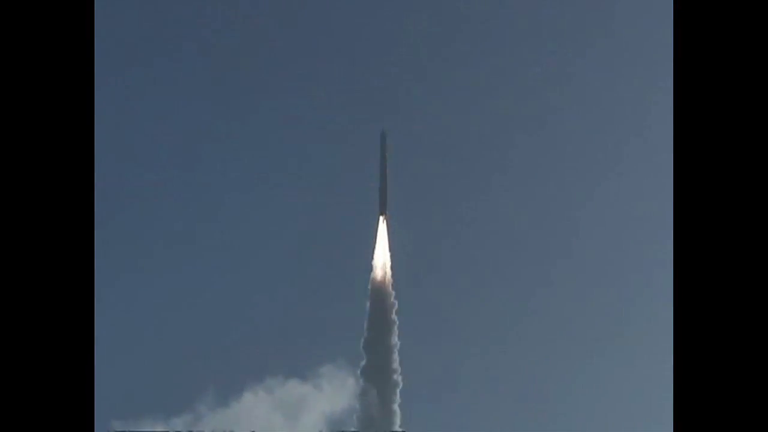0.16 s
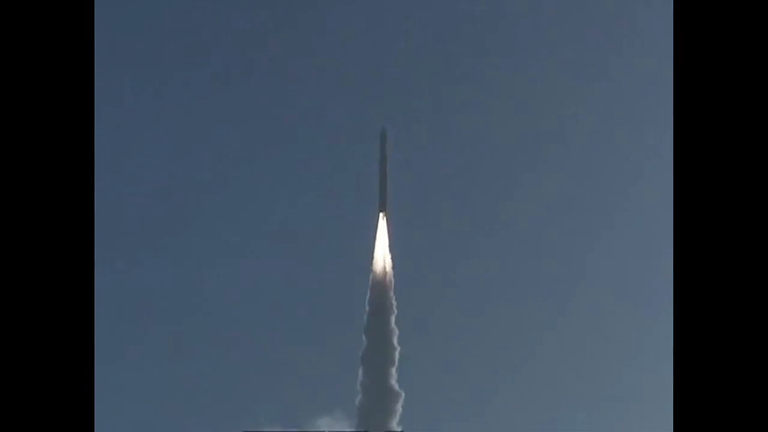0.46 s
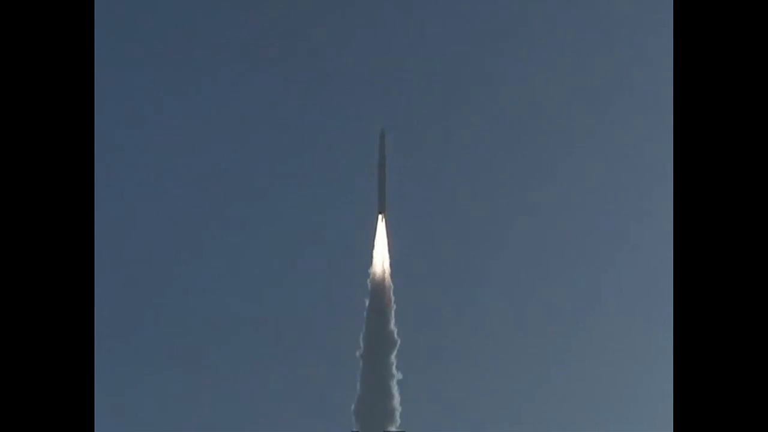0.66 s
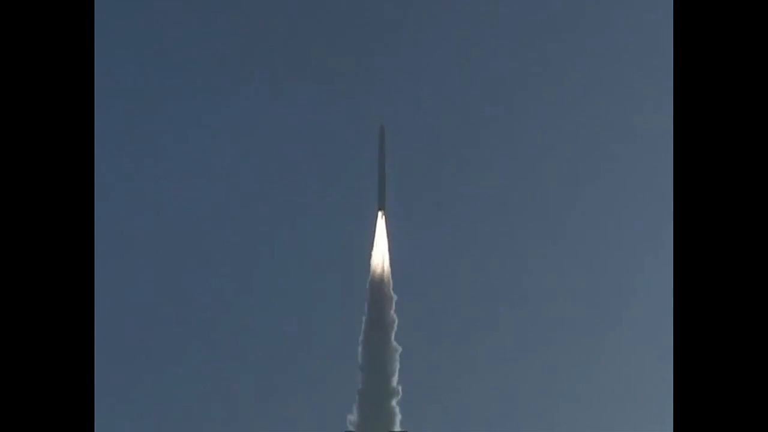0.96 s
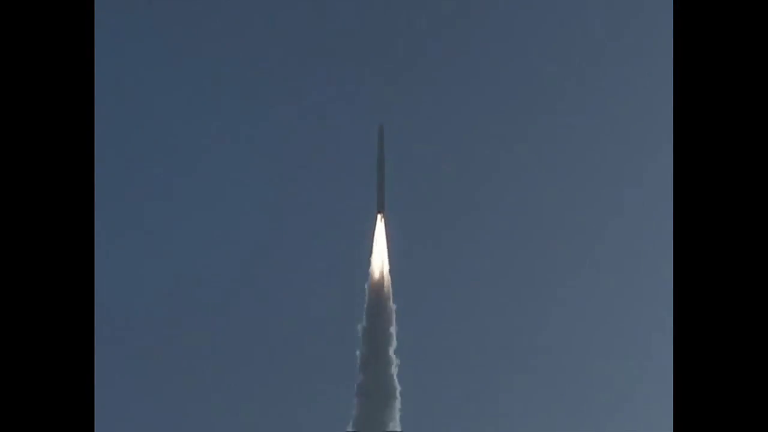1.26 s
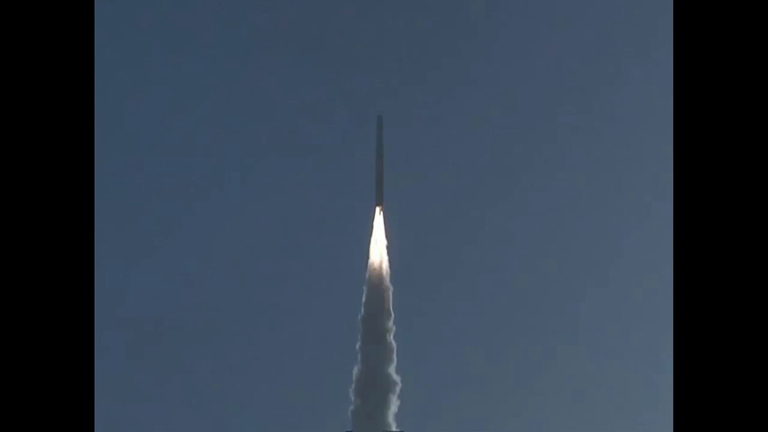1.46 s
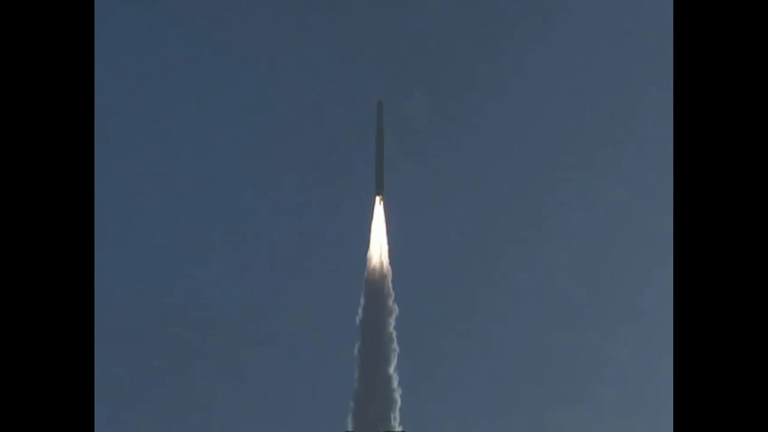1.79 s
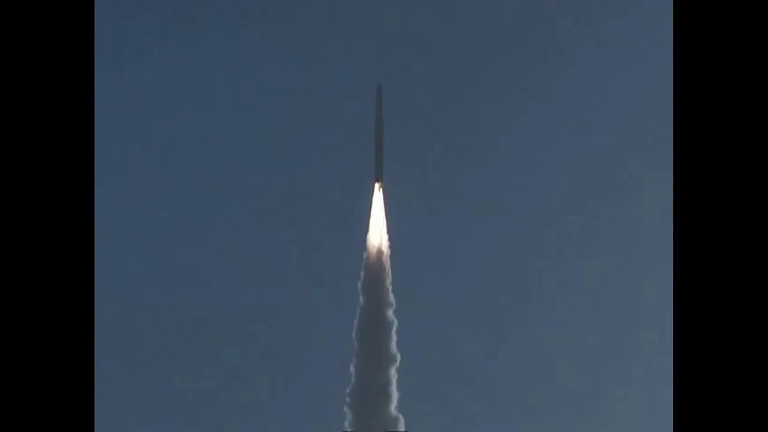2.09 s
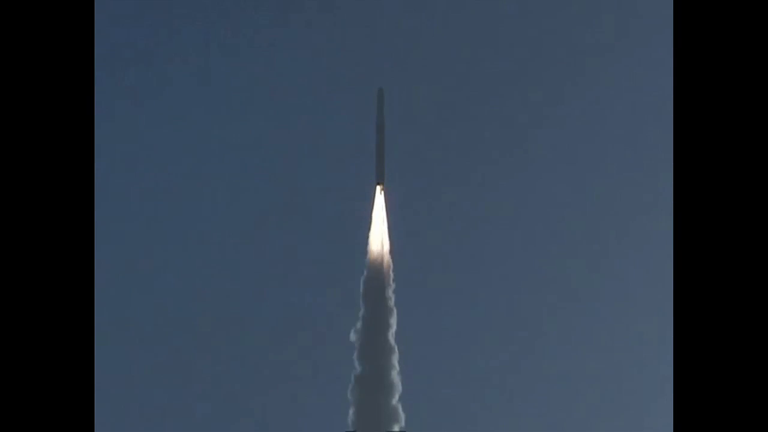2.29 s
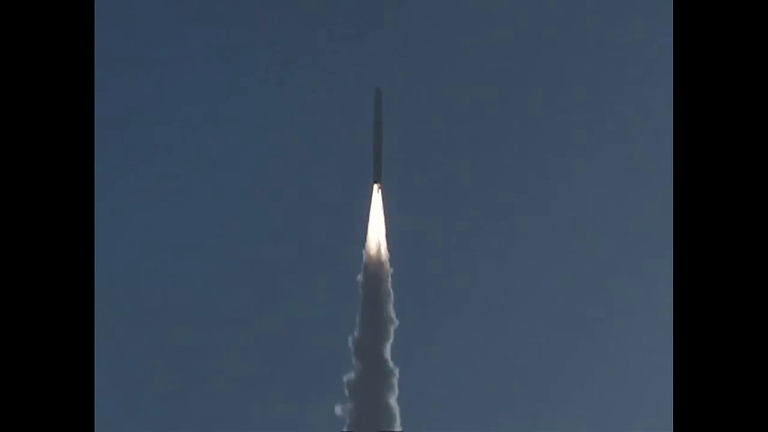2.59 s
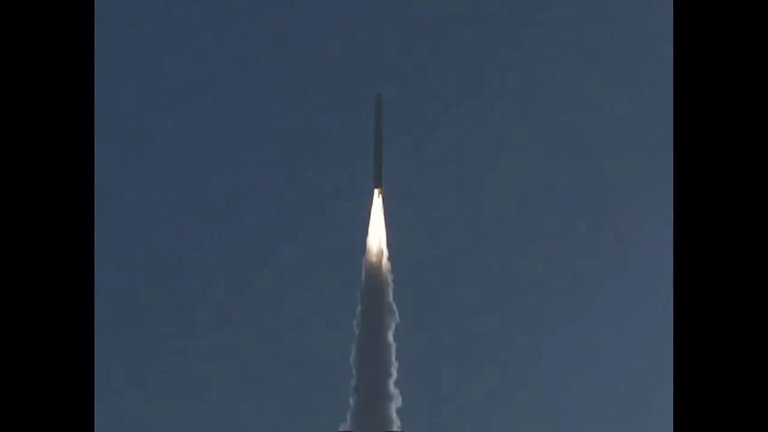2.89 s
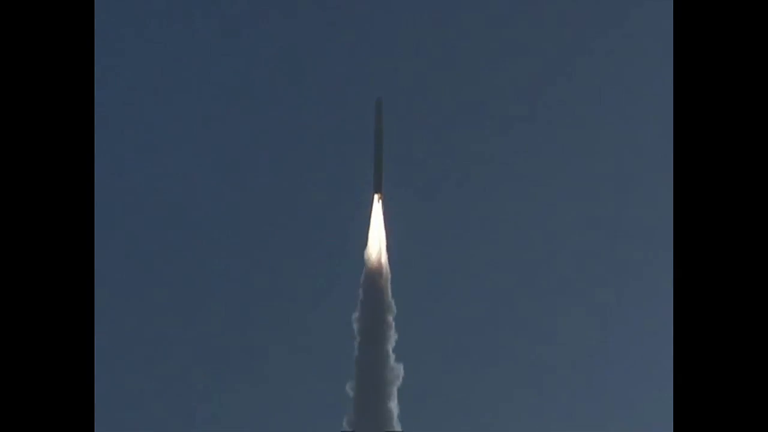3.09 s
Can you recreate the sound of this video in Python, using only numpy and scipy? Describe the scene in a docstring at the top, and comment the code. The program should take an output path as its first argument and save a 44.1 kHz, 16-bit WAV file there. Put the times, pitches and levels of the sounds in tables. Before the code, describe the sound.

Far-off rocket engines suddenly roar over a quiet windy field, peak, and settle into low rumble

```python
"""Light wind on the microphone with rustles and ticks nearby; then a far-off rocket's roar reaches the field,
swells fast and settles to a rumble with soft crackle; near the end, more ticks, a whirr and a squeak.
The roar is filtered noise plus random shocks, notched by a delayed ground echo. Wind, rustles, brushes
and hiss are shaped noise, ticks are fuzzy decaying sines, the whirr is banded noise, the squeak a gliding sine."""
import sys
import numpy as np
from scipy import signal
from scipy.fft import rfft, irfft
from scipy.io import wavfile
from scipy.ndimage import uniform_filter1d

SR = 44100
rng = np.random.default_rng(int(sys.argv[2]) if len(sys.argv) > 2 else 0)


def nominal_scale(level):
    """Amplitude ratio for a level in decibels (scalar or array-like)."""
    x = np.asarray(level, float) / 20
    return 10 ** x


def put_to_file(sound):
    """Save the sound as 16-bit audio at rate SR, in the file named by the first command-line argument."""
    columns = np.atleast_2d(sound).T  # one column per channel
    safe = np.clip(columns, -1, 1)
    whole_steps = np.round(safe * 32767)
    wavfile.write(sys.argv[1], SR, whole_steps.astype(np.int16))


N = 143325
T = np.arange(N) / SR
FRAME, HOP = 1024, 256  # short-time spectrum [samples]
PIVOT_HZ = 500  # the roar and its shocks are tilted above this


# roar at the listener: (time [s], level [dB], brightness above the pivot [dB/octave], extra bass [dB])
ROAR_PATH = [(1.12, -76, 2, -3.5), (1.2, -60.5, 4, 3), (1.27, -46, 0, -5), (1.35, -29.5, 0.4, -0.5),
             (1.44, -22.5, 0, -2), (1.54, -16.5, 0.75, -4), (1.64, -20, 1.1, 0), (1.72, -25.5, 1, 0.5),
             (1.79, -28.5, 2, -4.5), (1.9, -29, 0, 1), (2.05, -31, 1, 3), (2.25, -28.5, -1, 0.5),
             (2.5, -30.5, -2, 2.5), (2.65, -31.5, -0.75, 0), (2.8, -30, -0.2, 2.7), (3.0, -29, -1, 2),
             (3.12, -27.5, -1, -2.3), (3.25, -27, -1.2, -3.7)]
# relative spectrum of exhaust noise after the long air path: (frequency [Hz], density [dB per Hz])
EXHAUST_COLOUR = [(8, -41), (16, -11), (45, -4.5), (70, -3.5), (100, -4.5), (170, -6), (300, -9),
                  (480, -20), (620, -19.5), (900, -29), (1200, -33.5), (1500, -37), (2000, -41.5),
                  (2500, -46), (3200, -53), (4200, -60.5), (6000, -69.5), (9000, -75), (12000, -82.5),
                  (20000, -120)]


def roar():
    """Turbulent exhaust noise and shocks, patchy from drifting air, plus a soft ground echo that notches them."""
    flicker_db, patchy_db = 2.18, 0.71  # both rms
    shock_db = -1.2  # relative to the exhaust noise
    tilt_octaves, tilt_fade = 2.78, 1  # brightening peaks this far above the pivot, then fades
    bass_hz = 210  # top of the bass band
    echo_delay_s, echo_share, echo_soft_hz, echo_lag_rad = 0.002135, 0.8, 1450, 0.07

    flicker = nominal_scale(flicker_db * drift(size=300, count=N))
    exhaust = evened(coloured(rng.standard_normal(N) * flicker, EXHAUST_COLOUR))
    hz, t, z = patchy(exhaust - nominal_scale(shock_db) * shocks(), patchy_db, size=6, count=14)

    octaves = np.maximum(np.log2(hz / PIVOT_HZ + 1e-9), 0)
    tilt = octaves - (1 + tilt_fade) * np.maximum(octaves - tilt_octaves, 0)
    brightness_db = curve(ROAR_PATH, t, order=2) * tilt
    bass_db = curve(ROAR_PATH, t, order=3) / (1 + (hz / bass_hz) ** 4)
    direct = resynth(z * nominal_scale(brightness_db + bass_db))

    f = np.fft.rfftfreq(2 * N, 1 / SR)
    echo = echo_share * np.exp(-2j * np.pi * f * echo_delay_s - 1j * echo_lag_rad - f / echo_soft_hz)
    heard = irfft(rfft(direct, 2 * N) * (1 + echo))[:N]
    return evened(heard) * nominal_scale(curve(ROAR_PATH, T)) * (T > ROAR_PATH[0][0])


# loudest cracks in the roar: (time [s], size over the smallest random shock, before the spread is added [dB])
LOUD_CRACKS = [(1.453, 10), (1.479, 2), (1.536, 5.5), (1.542, 9.5), (1.566, 4), (1.598, 10), (1.629, 12.5),
               (1.638, 10), (1.686, 13.5), (1.76, 1), (1.826, -1), (2.005, 14.5), (2.028, 9), (2.071, 12),
               (2.383, 12), (2.511, 14.5), (2.958, 11.5)]


def shocks():
    """Sudden pressure fronts of uneven size, each with a short tail smeared by air turbulence."""
    per_s, spread_db = 700, 3.5
    scatter_s, scatter_db = 0.003, -3  # tail's amplitude decay time, its energy relative to the front

    size = nominal_scale(spread_db * np.minimum(rng.exponential(1, N), 4))
    fronts = size * (rng.random(N) < per_s / SR)
    fronts = fronts * np.sign(rng.random(N) - 0.3)  # seven in ten are positive
    for s, db in LOUD_CRACKS:
        fronts[round(s * SR)] += nominal_scale(db + spread_db)

    tail = np.exp(-2 * T[:1500] / scatter_s)  # decay of energy
    energy = abs(signal.oaconvolve(fronts ** 2, tail / tail.sum())[:N])
    scattered = nominal_scale(scatter_db) * rng.standard_normal(N) * np.sqrt(energy)
    return evened(coloured(fronts + scattered, EXHAUST_COLOUR, tilt_db=1.3, pivot_hz=PIVOT_HZ))


# gusts: (time [s], level [dB])
GUSTS = [(0.0, -81), (0.062, -60.5), (0.072, -97), (0.134, -54), (0.188, -67), (0.2, -49.5), (0.306, -50.5),
         (0.508, -58.5), (0.894, -51), (0.932, -67), (1.106, -71), (1.186, -72), (1.25, -72)]
# relative spectrum of the buffeting: (frequency [Hz], density [dB per Hz])
GUST_COLOUR = [(8.8, -22), (15, -7), (39, 3), (152, -10.5), (249, -19), (396, -32), (600, -44), (780, -79),
               (1320, -120)]


def wind():
    """Low noise with slow random lumps for buffeting; after the last gust it dies away at 100 dB/s."""
    lumps = nominal_scale(1 * drift(size=900, count=N))  # 1 dB rms
    gusts = evened(lumps * coloured(rng.standard_normal(N), GUST_COLOUR))
    return gusts * nominal_scale(curve(GUSTS, T) - 100 * np.maximum(T - GUSTS[-1][0], 0))


# rustles of grass or cloth: (start [s], hold [s], level [dB], fade t60 [s], brightest frequency [Hz])
RUSTLE_EVENTS = [(0.0, 0.086, -57.5, 0.013, 7000), (0.263, 0.026, -54, 0.14, 3900),
                 (0.322, 0.025, -54, 0.083, 6500), (0.346, 0.036, -58.5, 0.39, 4240),
                 (0.451, .006, -63, .02, 2500), (0.465, 0.011, -57.5, 0.071, 2500),
                 (0.487, 0.033, -69, 0.3, 4500), (0.54, 0.059, -67.5, 0.31, 2500),
                 (0.605, 0.036, -80, 0.11, 8000), (0.639, 0.018, -64, 0.29, 8000),
                 (0.676, 0.031, -73.5, 0.079, 3530), (0.731, 0.046, -66.5, 0.074, 4300),
                 (.79, 0.33, -78.5, 0.54, 4000), (0.858, 0.015, -72, 0.061, 5600),
                 (3.004, 0.19, -74.5, 0.11, 8800)]
# relative spectrum they share: (frequency [Hz], density [dB per Hz])
RUSTLE_COLOUR = [(290, -28), (500, -9.5), (984, -18), (1550, -8), (1700, -10.5), (2040, -6), (2430, -9),
                 (2810, -4.5), (3660, -4), (4130, -1), (5390, -7.5), (7030, -5.5), (8920, -7.5),
                 (10600, -8.5), (12000, -13.5), (15500, -49), (22000, -120)]


def rustles():
    """Grainy, patchy noise that starts abruptly, holds and fades; each has its own brightest region."""
    grain_db, patchy_db = 1.5, 1.5  # both rms
    hump_db, hump_octaves, attack_s = 8, 1, 0.0007

    grain = rng.standard_normal(N) * nominal_scale(grain_db * drift(size=60, count=N))
    z = patchy(coloured(grain, RUSTLE_COLOUR), patchy_db, size=12, count=4)[2]
    base = rfft(resynth(z))
    hz, out = np.fft.rfftfreq(N, 1 / SR) + 1, np.zeros(N)
    for s, hold, db, t60, top_hz in RUSTLE_EVENTS:
        hump = hump_db * np.exp(-(np.log2(hz / top_hz) / hump_octaves) ** 2)
        tone = evened(irfft(base * nominal_scale(hump), N))
        attack = np.clip((T - s) / attack_s, 0, 1)
        out += tone * attack * nominal_scale(db - 60 * np.maximum(T - s - hold, 0) / t60)
    return out


# dull brushes near the microphone: (middle [s], half length to 1/e [s], level [dB], centre [Hz], width [Hz])
BRUSH_EVENTS = [(0.119, 0.011, -71, 740, 500), (0.16, 0.034, -71, 690, 800),
                (0.455, 0.093, -74.5, 690, 245), (1.148, 0.038, -64, 148, 70)]


def brushes():
    """Soft low puffs: resonant noise under bell-shaped swells."""
    air, out = rng.standard_normal(N), np.zeros(N)
    for s, half, db, hz, width_hz in BRUSH_EVENTS:
        swell = np.exp(-((T - s) / half) ** 2)
        out += nominal_scale(db) * swell * narrow_band(air, hz, width_hz)
    return out


# small ticks: (time [s], envelope peak before fuzz [dB], ring [Hz], width [Hz])
TICK_EVENTS = [(.264, -53.5, 2110, 70), (0.326, -44.5, 3340, 110), (0.468, -58, 1420, 90),
               (0.575, -48.5, 2500, 260), (0.579, -52, 3400, 300), (0.601, -53, 2870, 250),
               (.942, -54.5, 674, 190), (1.099, -58, 2980, 111), (1.275, -61, 4930, 200),
               (3.023, -42, 9900, 2200), (3.033, -45, 8300, 650), (3.123, -41.5, 8600, 1000),
               (3.124, -48, 4100, 500), (3.165, -53, 7300, 800), (3.178, -48, 4300, 600),
               (3.207, -35, 2770, 450), (3.225, -48, 3200, 220), (3.223, -48, 4500, 600)]


def ticks():
    """Each tick is a short ring, roughened by smoothed noise, that swells and dies."""
    out, t = np.zeros(N), np.arange(900) / SR
    fuzz = 1 + rng.standard_normal((len(TICK_EVENTS), len(t)))
    for (s, db, hz, width_hz), rough in zip(TICK_EVENTS, fuzz):
        part = out[round(s * SR):][:len(t)]
        u = 2 * np.pi * width_hz * t
        swell = (u * np.exp(1 - u)) ** 2
        ring = uniform_filter1d(rough, size=12) * np.sin(2 * np.pi * hz * t)
        part += (nominal_scale(db) * swell * ring)[:len(part)]
    return out


# faint whirr that ends in a scrape: (time [s], level of upper bands [dB], level of lower bands [dB])
WHIRR_PATH = [(3.03, -94, -95), (3.06, -69, -99), (3.13, -56.5, -72), (3.17, -67, -62), (3.18, -63, -65),
              (3.2, -65, -74), (3.208, -58, -51), (3.225, -54.5, -47.5), (3.25, -63, -56)]
# its bands, levels relative within each group: (frequency [Hz], width [Hz], level [dB])
UPPER_BANDS = [(4000, 540, 14.5), (4500, 470, -13), (5500, 680, -2), (8000, 900, -23)]
LOWER_BANDS = [(3110, 470, 4), (1830, 960, 3.5), (2500, 250, -13)]


def whirr():
    """Grainy noise ringing in two groups of bands, each with its own level path."""
    grain = rng.standard_normal(N) * nominal_scale(1 * drift(size=90, count=N))  # 1 dB rms
    upper = evened(sum(nominal_scale(db) * narrow_band(grain, hz, w) for hz, w, db in UPPER_BANDS))
    lower = evened(sum(nominal_scale(db) * narrow_band(grain, hz, w) for hz, w, db in LOWER_BANDS))
    body = upper * nominal_scale(curve(WHIRR_PATH, T)) + lower * nominal_scale(curve(WHIRR_PATH, T, order=2))
    return body * (T > WHIRR_PATH[0][0])


# thin squeak: (time [s], pitch [Hz], level [dB])
SQUEAK_PATH = [(3.172, 8050, -90), (3.18, 8260, -73), (3.203, 9100, -63), (3.21, 8500, -68),
               (3.215, 8300, -90)]


def squeak():
    """One sine whose pitch rises and then falls back."""
    phase = 2 * np.pi * np.cumsum(curve(SQUEAK_PATH, T)) / SR
    sounding = (T > SQUEAK_PATH[0][0]) * (T < SQUEAK_PATH[-1][0])
    return np.sin(phase) * nominal_scale(curve(SQUEAK_PATH, T, order=2)) * sounding


# relative spectrum of the background: (frequency [Hz], density [dB per Hz])
HISS_COLOUR = [(12, -66.5), (20, 12.5), (261, -13), (290, -13.5), (445, -11.5), (537, -16.5), (597, -16),
               (1370, -16.5), (1480, -14.5), (4440, -15.5), (12000, -21.5), (15500, -25.5), (22000, -120)]
# faint steady whines: (frequency [Hz], width [Hz], level [dB])
WHINE_BANDS = [(8600, 180, -85.5), (7300, 250, -88)]


def hiss():
    """Quiet steady noise of field and microphone, with whines of narrowly resonant noise."""
    whines = sum(nominal_scale(db) * evened(resonate(rng.standard_normal(N), hz, w)) for hz, w, db in WHINE_BANDS)
    return nominal_scale(-67.5) * evened(coloured(rng.standard_normal(N), HISS_COLOUR)) + whines


def evened(x):
    """Scales to rms 1."""
    return x / np.sqrt(np.mean(x ** 2) + 1e-20)


def read(points, hz):
    """Reads a spectrum table on a log-frequency axis."""
    f, value = np.transpose(points)
    return np.interp(np.log(hz + 1), np.log(f + 1), value)


def curve(rows, t, order=1):
    """Reads one column of a table over time."""
    return np.interp(t, [r[0] for r in rows], [r[order] for r in rows])


def drift(size, count):
    """Slow chance, smoothed twice over size samples, rms 1."""
    return evened(uniform_filter1d(uniform_filter1d(rng.standard_normal(count), size), size))


def coloured(x, spectrum, tilt_db=0, pivot_hz=1000):
    """Minimum-phase filter with the given spectrum, tilted by tilt_db per octave above the pivot."""
    hz = np.fft.rfftfreq(8192, 1 / SR)
    tilt = tilt_db * np.log2(np.maximum(hz / pivot_hz, 1))
    db = np.maximum(read(spectrum, hz) + tilt, -100)
    cepstrum = irfft(np.log(nominal_scale(db)))
    cepstrum[1:4096] *= 2  # folding the cepstrum makes the filter causal
    cepstrum[4097:] = 0
    impulse = irfft(np.exp(rfft(cepstrum)))[:6000]
    return signal.oaconvolve(x, impulse)[:len(x)]


def resonate(x, hz, width_hz):
    """A resonance of gain 1: shifts hz down to zero, smooths, shifts back."""
    turn = np.exp(2j * np.pi * np.cumsum(hz * np.ones(len(x))) / SR)
    r = np.exp(-np.pi * width_hz / SR)
    return 2 * (turn * signal.lfilter([1 - r], [1, -r], x / turn)).real


def narrow_band(x, hz, width_hz):
    """Two equal resonances in a row, scaled to rms 1."""
    return evened(resonate(resonate(x, hz, width_hz), hz, width_hz))


def patchy(x, db, size, count):
    """Short-time spectrum of x with random louder and quieter patches, size bins by count frames."""
    hz, t, z = signal.stft(x, SR, nperseg=FRAME, noverlap=FRAME - HOP)
    patches = rng.standard_normal(z.shape[::-1]).T
    patches = uniform_filter1d(uniform_filter1d(patches, size, axis=0), count, axis=1)
    return hz[:, None], t, z * nominal_scale(db * evened(patches))


def resynth(z):
    """Back from short-time spectrum to sound."""
    return signal.istft(z, SR, nperseg=FRAME, noverlap=FRAME - HOP)[1][:N]


def scene():
    """Everything at one microphone."""
    near = rustles() + brushes() + ticks() + whirr() + squeak()
    return (roar() + wind() + near + hiss())[None]


def top_cut(x):
    """Nothing passes above the cut-off."""
    return signal.sosfilt(signal.butter(12, 12100, fs=SR, output="sos"), x)


def record(dry):
    """Soft rounding of the peaks, then a steep low-pass at 12 kHz."""
    soft_peak = 0.4  # full scale is 1
    rounded = soft_peak * np.tanh(dry / soft_peak)
    low_pass = signal.firwin(801, 12000, window=("kaiser", 9), fs=SR)
    mix = signal.oaconvolve(rounded, low_pass[None], "same")
    return top_cut(mix)


dry = scene()
out = record(dry)
put_to_file(out)
```